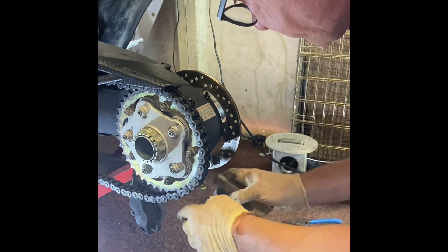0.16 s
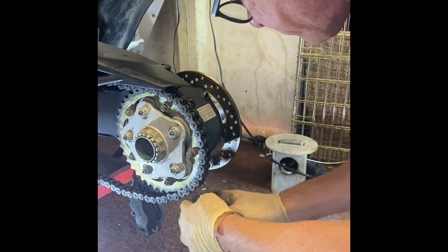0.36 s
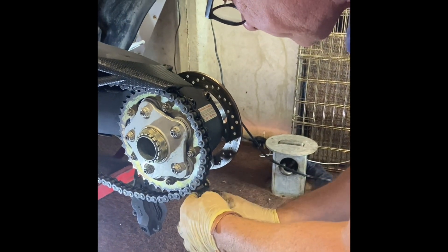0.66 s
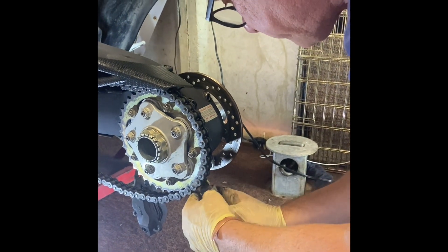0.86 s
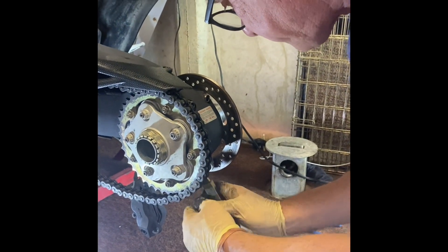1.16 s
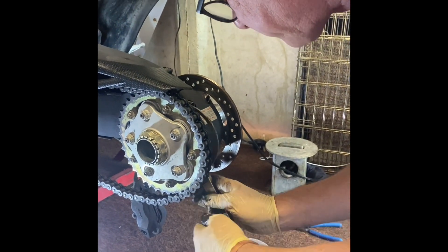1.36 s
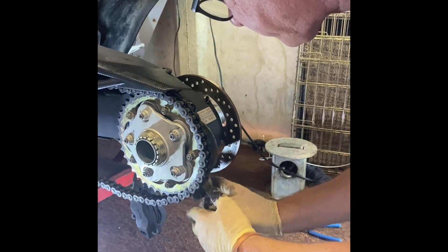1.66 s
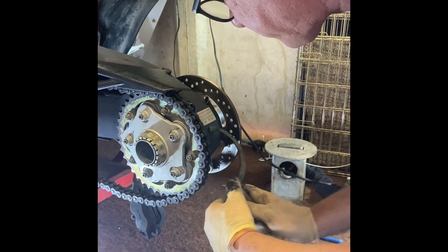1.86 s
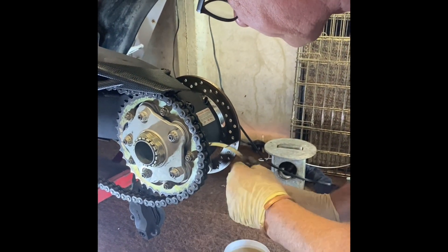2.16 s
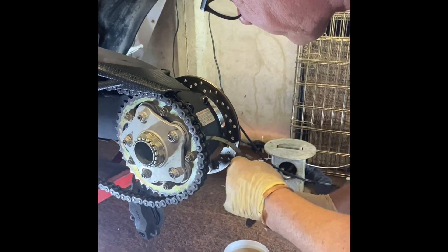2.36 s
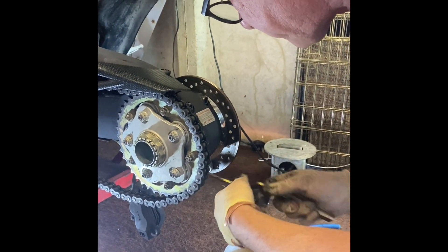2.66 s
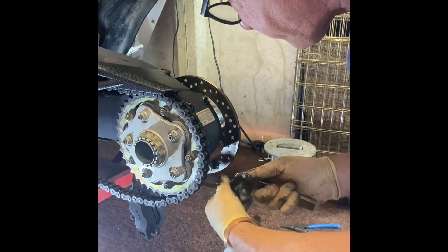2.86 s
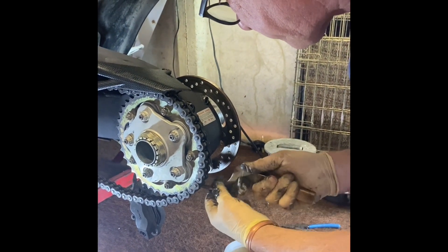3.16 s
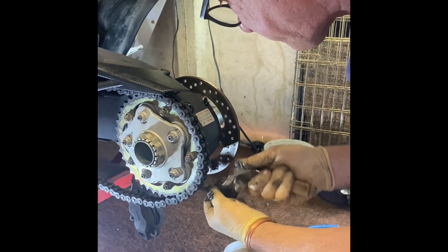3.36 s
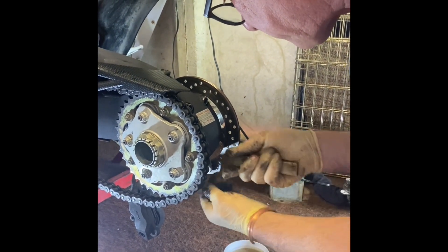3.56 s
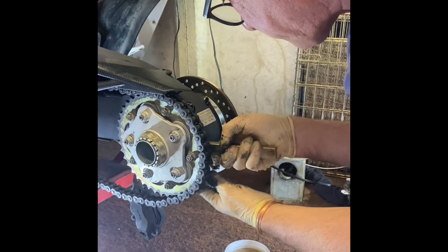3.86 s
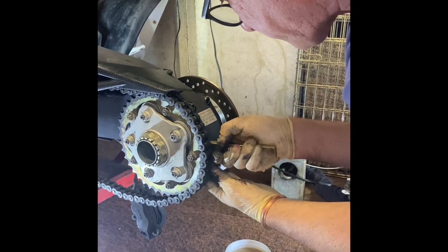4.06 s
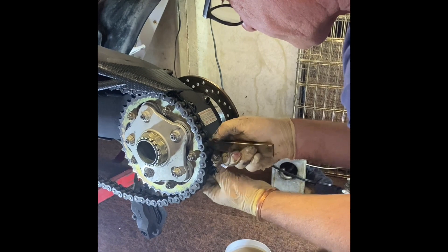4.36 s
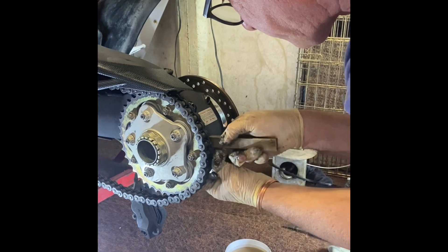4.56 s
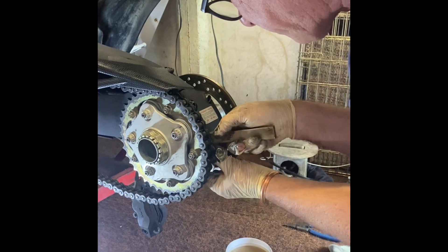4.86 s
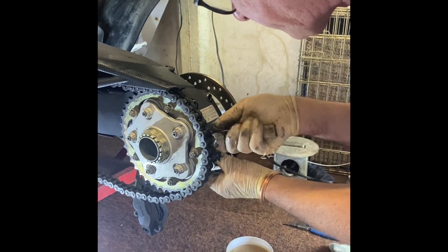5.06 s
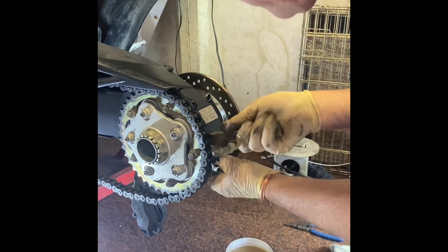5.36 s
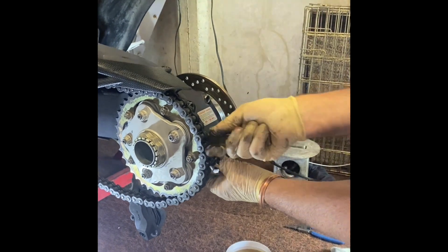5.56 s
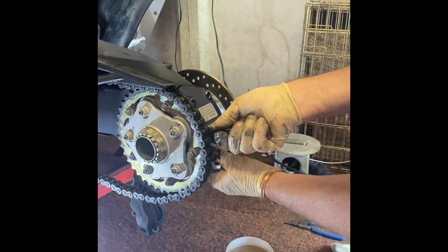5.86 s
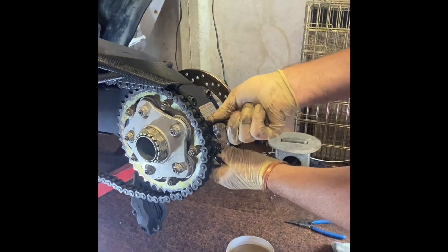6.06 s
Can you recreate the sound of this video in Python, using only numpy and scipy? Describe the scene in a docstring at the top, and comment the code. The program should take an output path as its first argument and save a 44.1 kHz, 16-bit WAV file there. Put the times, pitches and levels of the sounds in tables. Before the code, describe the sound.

Close stereo pickup in a small garage. A soft glove rub, then from under a second a loose steel chain clinks, scrapes and jangles brightly over a sprocket for about two seconds. Gripped firmly, it turns to drier, duller clicks with rubbery rubs; after a sparse stretch, sharp knocks land near the end. Faint birds, low motor hum and a quiet outdoor rush continue underneath.

```python
"""Birds call faintly outside and a motor hums in the building, over a quiet rush, from start to end.
A glove rub opens; from about 0.7 s gloved hands feed a slack steel drive chain over a motorcycle's
rear sprocket: modal links rattle, jostle and scrape, and the sprocket's sine modes ring.
By 2.8 s the grip is full and damps the links to dull clicks; rubber rubs in grains of noise, faint
ticks seat the links, and late blows near 5.3-5.6 s thud through the wheel. Garage walls answer."""
import sys
import numpy as np
from scipy import signal
from scipy.fft import rfft, irfft, next_fast_len
from scipy.io import wavfile
from scipy.ndimage import uniform_filter1d, map_coordinates

SR = 44100
rng = np.random.default_rng(int(sys.argv[2]) if len(sys.argv) > 2 else 0)


def to_wav(sig):
    """Store sig (one row per channel, or 1-D mono) as 16-bit WAV at the path in sys.argv[1].

    Samples outside -1..1 are clipped; the rate is SR.
    """
    pcm = np.clip(np.atleast_2d(sig), -1, 1) * 32767
    pcm = np.round(pcm).astype(np.int16)
    wavfile.write(sys.argv[1], SR, pcm.T)  # frames by channels


N = 272979
TIME = np.arange(N) / SR
# Levels in tables are source levels, ahead of the mix gains.


def amp(db):
    """dB to linear gain."""
    return 10 ** (np.asarray(db) / 20)


def unit(x):
    """Scale to rms 1."""
    return x / np.sqrt(np.mean(x ** 2) + 1e-20)


def burst(x):
    """Scale to the energy of 10 ms at rms 1."""
    return x * np.sqrt(SR / 100 / (np.sum(x ** 2) + 1e-20))


def along(points, hz):
    """Interpolate (f/Hz, value) points on a log frequency axis."""
    f, v = np.transpose(points)
    return np.interp(np.log(hz + 1), np.log(f + 1), v)


def curve(points):
    """Interpolate (t/s, value) points at every sample."""
    return np.interp(TIME, *np.transpose(points))


def wobble(knots_per_s, size=N):
    """Smooth random curve."""
    knots = rng.standard_normal(int(size * knots_per_s / SR) + 4)
    return map_coordinates(knots, [TIME[:size] * knots_per_s])


def filtered(x, response):
    """Multiply the spectrum by a complex response of frequency."""
    n = x.shape[-1]
    m = next_fast_len(n + SR // 20)
    return irfft(rfft(x, m) * response(np.fft.rfftfreq(m, 1 / SR)), m)[..., :n]


def band(x, low_hz, high_hz, order=2):
    """Causal Butterworth band-pass."""
    edges_hz = [low_hz, min(high_hz, SR / 2 - 1)]
    return signal.sosfilt(signal.butter(order, edges_hz, "band", fs=SR, output="sos"), x)


def add(track, s, sound):
    """Mix a sound into a track at time s."""
    part = track[max(0, round(s * SR)):][:len(sound)]
    part += sound[:len(part)]


# Rush spectrum: f/Hz, relative density/dB per Hz
AIR_SPECTRUM = [(25, -14.5), (58, 2), (110, -0.5), (200, -12.5), (850, -25.5), (6000, -28), (8500, -54),
                (16000, -59)]
# Brief dips of the rush: t/s
LULLS_S = [0.39, 4.9, 5.76]
LULL_HALF_S, LULL_DEPTH_DB = .09, 2.5
AIR_SWELL_DB, AIR_PATCH_DB = 0.95, 2.5  # rms of slow swell and of time-frequency patches


def air():
    """Outdoor rush: shaped noise that swells and sinks in patches, nearly mono in the bass."""
    z = signal.stft(rng.standard_normal((2, N)), nperseg=1024)[2]
    patches = uniform_filter1d(rng.standard_normal(z.shape[1:]), 14, 0)
    patches = unit(uniform_filter1d(patches, 12, 1))
    noise = signal.istft(z * amp(AIR_PATCH_DB * patches), nperseg=1024)[1][:, :N]
    mid, side = filtered(noise, lambda hz: amp(along(AIR_SPECTRUM, hz)))
    side = filtered(side, lambda hz: amp(along([(70, -17.5), (300, 3), (2000, 3.5)], hz)))
    level = amp(-64.0 + AIR_SWELL_DB * wobble(6.0))
    rush = level * unit(np.array([mid + side, mid - side]))
    lulls = sum(np.exp(-((TIME - s) / LULL_HALF_S) ** 2) for s in LULLS_S)
    return rush * amp(-LULL_DEPTH_DB * lulls)


# Motor hum: t/s, level/dB rms of the fundamental
HUM_LEVEL = [(.6, -53.5), (.9, -60), (2.5, -61.5), (2.85, -55), (3.9, -53.5), (5.4, -59), (6.1, -54.5)]
HUM_HZ = 80.4


def hum():
    """Distant motor: a drone of wavering pitch and level with a weak third harmonic."""
    level = amp(curve(HUM_LEVEL) + 1.3 * wobble(21))
    phase = 2 * np.pi * np.cumsum(HUM_HZ + 1.9 * wobble(3.0)) / SR
    return np.sqrt(2) * level * (np.sin(phase) + amp(-30.5) * np.sin(3 * phase))


# Single calls: t/s, length/s, start f/Hz, end f/Hz, level/dB
WHISTLES = [(.4, 0.36, 1850, 2230, -81), (2.18, 0.19, 2220, 2050, -79.5), (1.95, 0.25, 2800, 2520, -75.5),
            (6.02, 0.12, 2060, 2030, -78.5)]
# Repeats of a second bird's phrase: t/s, level/dB
CHIRPS = [(0.159, -84), (0.491, -80.5), (4.0, -86.5), (4.73, -80.5), (5.109, -82.5), (5.832, -82.5)]
# Its syllables: delay/s, length/s, start f/Hz, end f/Hz, relative level/dB
PHRASE = [(0, 0.073, 7040, 5570, -4.5), (0.03, .12, 4145, 3700, -3)]
CALL_ARCH = .022  # mid-call pitch lift, share
BIRD_BREATH_DB = 5  # level flutter, rms


def birds(pitch_waver):
    """Bird calls: each swells, flutters and fades while its pitch glides and settles."""
    track = np.zeros(N)
    chirps = [(s + delay, length, start_hz, end_hz, db + rel_db)
              for s, db in CHIRPS for delay, length, start_hz, end_hz, rel_db in PHRASE]
    for s, length, start_hz, end_hz, db in WHISTLES + chirps:
        u = np.linspace(0, 1, int(length * SR))
        arch = np.sin(np.pi * u)
        glide_hz = end_hz + (start_hz - end_hz) * (1 - u) ** 2
        hz = glide_hz * (1 + CALL_ARCH * arch + pitch_waver * wobble(400.3, size=len(u)))
        level = amp(db + BIRD_BREATH_DB * wobble(78.6, size=len(u))) * arch
        add(track, s, level * np.sin(2 * np.pi * np.cumsum(hz) / SR))
    return track


# Garage decay: f/Hz, t60/s
GARAGE = [(150, 0.55), (1000, 0.2), (4000, 0.14), (14000, 0.0038)]


def garage(x, build_s=0.0018):
    """Diffuse wall answer: convolution with decaying noise, different at each microphone."""
    hz, t, z = signal.stft(rng.standard_normal((2, SR // 2)), SR, nperseg=256)
    decay = amp(-60 * t / along(GARAGE, hz)[:, None]) * (1 - np.exp(-t / build_s))
    tail = signal.istft(z * decay, SR, nperseg=256)[1]
    return signal.fftconvolve(x[None], tail / np.linalg.norm(tail[0]), axes=1)[:, :N]


# Gained by the right port and lost by the left: f/Hz, level/dB
SHADE = [(80, 1), (220, 6), (1100, 3), (6000, 0.06)]


def placed(x, lead_samples=2.19, right_db=0):
    """Two ports: the left hears slightly earlier, the right louder, most in the low middle."""
    left = filtered(x, lambda hz: amp(-along(SHADE, hz)))
    delay = lambda hz: np.exp(-2j * np.pi * hz * lead_samples / SR)
    right = filtered(x, lambda hz: amp(along(SHADE, hz)) * delay(hz))
    return np.array([amp(-right_db) * left, amp(right_db) * right])


# Dull blows through wheel and stand: t/s, level/dB, f/Hz
THUDS = [(0.047, -51, 380), (0.795, -54.5, 475), (1.25, -53, 300.5), (2.795, -42, 368.5),
         (3.189, -48, 278.5), (5.301, -50, 337), (5.575, -49, 758), (5.581, -49, 295.7)]
# Low wheel modes, ratio to a thud's pitch
WHEEL_RATIOS = (.7, .95, 1.25)
THUD_T60_S = 0.11


def wheel():
    """Heavier blows shake wheel and stand: low sine modes plus band noise, decaying."""
    track, t = np.zeros(N), np.arange(SR // 3) / SR
    for s, db, hz in THUDS:
        boom = sum(np.sin(2 * np.pi * hz * ratio * t) for ratio in WHEEL_RATIOS)
        rumble = unit(band(rng.standard_normal(len(t)), hz / 1.8, hz * 1.9))
        add(track, s, amp(db - 60 * t / THUD_T60_S) * unit(boom + rumble))
    return track


# Glove strokes: t/s at the middle, length/s, rub level/dB, rustle relative level/dB
STROKES = [(0.086, 0.3, -67.5, 6), (1.209, 0.15, -51, -14), (3.28, 0.47, -73, 2), (3.922, 0.07, -56.5, -14),
           (4.179, 0.058, -58.5, -4), (4.433, 0.22, -56.5, -9), (4.68, 0.15, -59.5, -14),
           (5.033, 0.096, -70, 13), (5.219, 0.27, -82.5, 13), (5.345, 0.14, -60.5, -4),
           (5.568, 0.14, -52, 3.5), (5.928, 0.12, -69, 5)]


def grains():
    """Noise broken into small grains by a fast random level."""
    return rng.standard_normal(N) * amp(4.3 * wobble(450))


def gloves():
    """Rubber rubs and rustles over greasy links: grainy noise that swells and fades per stroke."""
    rub_level = rustle_level = 0
    for s, length, db, rustle_db in STROKES:
        swell = amp(db) * np.exp(1 - np.hypot(1, 5.07 * (TIME - s) / length))
        rub_level = rub_level + swell
        rustle_level = rustle_level + amp(rustle_db) * swell
    pressure = amp(2 * wobble(25))
    rub = rub_level * unit(band(grains(), 340, 3300))
    rustle = rustle_level * unit(band(grains(), 2900, 6000, order=3))
    return (rub + rustle) * pressure


# Clear notes left by some blows: t/s, level/dB, f/Hz, t60/s
NOTES = [(1, -24.5, 4276, 0.054), (1.273, -39.5, 1125, 0.09), (1.343, -33, 1150, 0.047),
         (1.542, -42.5, 1112, 0.095), (1.836, -20.5, 4430, 0.047), (2.324, -25, 5560, 0.044),
         (2.469, -49.5, 1076, 0.2), (2.502, -15.5, 4200, 0.034), (2.791, -35, 1750, 0.035),
         (2.932, -56, 587, 0.18), (3.339, -30.5, 6684, 0.077), (5.278, -15, 4330, 0.0073),
         (5.362, -26.5, 4346, 0.029)]


def notes():
    """A part that hangs free rings on: one decaying sine of shaken phase."""
    track, t = np.zeros(N), np.arange(SR // 3) / SR
    for s, db, hz, t60 in NOTES:
        phase = 2 * np.pi * hz * t + .4 * wobble(120, size=len(t))
        add(track, s, amp(db - 60 * t / t60) * (1 - np.exp(-t / 0.0013)) * np.sin(phase))
    return track


def resonate(x, modes, damping, scrape_db=-17):
    """Steel resonances, redrawn per call in pitch and level, over a broad scrape."""
    drawn = []
    for hz, width_hz, db in modes:
        width = width_hz * damping
        centre = hz + 30 * np.sqrt(width / 20) * rng.normal()
        drawn.append((centre, width, amp(db + 3.5 * rng.normal())))

    def response(f):
        """Sum of resonant peaks of alternating sign, plus the flat scrape."""
        peaks = sum((-1) ** k * g * 1j * f * w / (c * c - f * f + 1j * f * w)
                    for k, (c, w, g) in enumerate(drawn))
        return peaks + amp(scrape_db)

    return filtered(x, response)


# Main link resonances, slack: f/Hz, width/Hz, level/dB
LINK = [(3400, 300, -11), (3900, 200, -7), (4280, 75, 3), (4490, 110, -3), (4850, 200, -14)]
LINK_SPREAD = .025  # pitch deviation between links, share


def link_modes():
    """Main resonances of one link, at its own pitch."""
    pitch = 1 + LINK_SPREAD * rng.normal()
    return [(hz * pitch, width, db) for hz, width, db in LINK]


def bright_modes(db=0):
    """Two upper resonances of one link, drawn over a range; slack width 80 Hz."""
    return [(hz, 80, db) for hz in rng.uniform(5400, 6800, size=2)]


# Briskness of the slack chain's slide: t/s, level/dB
FEED = [(0.869, -73.5), (1.02, -57.5), (1.12, -77), (1.29, -52.5), (1.63, -69.5), (1.72, -51.5),
        (1.902, -48), (2.04, -64.5), (2.26, -70), (2.349, -56), (2.509, -55.5), (2.778, -71.5)]
LINKS_PER_S = 28
SLIDE_DB = -3.5  # scrape relative to FEED


def slide():
    """Moving chain scrapes the teeth: overlapping noise chatters through each link's resonances."""
    track, size = np.zeros(N), int(2 * SR / LINKS_PER_S)
    for s in np.arange(FEED[0][0], FEED[-1][0], 1 / LINKS_PER_S):
        chatter = rng.standard_normal(size) * amp(11 * wobble(450, size=size)) * np.hanning(size)
        scrape = resonate(chatter, link_modes() + bright_modes(db=-6), 1)
        scrape = unit(band(scrape, 1800, 6800))
        add(track, s - 1 / LINKS_PER_S, amp(4 * rng.normal()) * scrape)
    return amp(SLIDE_DB + curve(FEED)) * unit(track)


JOSTLE_PER_S, JOSTLE_DB = 11, 7  # level relative to FEED
JOSTLE_KNOCK_DB, JOSTLE_BRIGHT_DB, JOSTLE_S = -9.5, -0.5, 0.014  # last: rattle length


def jostles():
    """Random small contacts while the chain slides, stronger when it slides briskly."""
    times, feed_db = np.transpose(FEED)
    count = int(JOSTLE_PER_S * (times[-1] - times[0]))
    moments = rng.uniform(times[0], times[-1], count)
    return [(s, np.interp(s, times, feed_db) + JOSTLE_DB, JOSTLE_KNOCK_DB, JOSTLE_BRIGHT_DB, JOSTLE_S)
            for s in moments]


# Fingers seat the links: t/s, level/dB
TICKS = [(4.089, -58.5), (4.426, -55.5), (4.668, -56), (5.206, -61)]


def ticks():
    """Held links shift between the fingers: contacts with faint dry ticks."""
    return [(s, db, JOSTLE_KNOCK_DB, -10, .004) for s, db in TICKS]


# Hands close on the chain: t/s, grip/0-1
GRIP = [(1.45, 0), (1.7, .1), (2.55, .1), (2.8, 1)]
GRIP_WIDENS = 3.67  # extra damping at full grip, ratio
GRIP_MUTES_DB, GRIP_PAN_DB = 4, 0.5  # at full grip: teeth muted; right up and left down


def grip(s):
    """How firmly the chain is held at time s, 0-1."""
    return np.interp(s, *np.transpose(GRIP))


# Sprocket modes, slack chain: f/Hz, level/dB, t60/s
SPROCKET = [(1120, -6, .13), (2396, 2, .16), (4270, 9, .12), (5610, 6, .14), (6218, 13, .15),
            (7537, 8, .15), (7876, 8, .16), (11350, -2, .17), (12540, -2, .16), (14600, 0, .2)]
# Striking link's high partials: low f/Hz, high f/Hz, level/dB
PARTIALS = [(5000, 7000, 11), (7300, 8200, 9), (9500, 13000, -2), (14700, 15700, 2)]
PARTIAL_T60_S = 0.041  # slack
LOAD_DETUNE, LOAD_WAVER_RAD = .007, .8  # mode shift (share, slack), phase shake


def sprocket(t, damping):
    """A blow wakes sprocket modes detuned by the links on it; the striking link adds high partials."""
    partials = [(rng.uniform(low, high), db, PARTIAL_T60_S) for low, high, db in PARTIALS]
    ring = 0
    for hz, db, t60 in SPROCKET + partials:
        loaded_hz = hz * (1 + LOAD_DETUNE * damping * rng.normal())
        phase = 2 * np.pi * (loaded_hz * t + rng.random())
        phase = phase + LOAD_WAVER_RAD * wobble(150, size=len(t))
        level = amp(db + 4.5 * rng.normal() - 60 * t * damping / t60)
        ring = ring + level * np.sin(phase)
    return ring * (1 - np.exp(-t / 0.00031))


def rattle(t, length, lead_db, impacts_per_s=2200, first=1.44, grit=0.058):
    """Links slide, catch with a first blow at t = 0, then pins, rollers and plates chatter away."""
    impacts = (rng.random(len(t)) < impacts_per_s / SR) * rng.standard_normal(len(t))
    impacts = impacts + grit * rng.standard_normal(len(t))
    impacts[np.searchsorted(t, 0)] = first
    lead_in = amp(lead_db) * np.exp(-np.abs(t) / .004)
    return impacts * np.where(t < 0, lead_in, np.exp(-(t / max(length, 1e-4)) ** 2))


# Clearest chain contacts: t/s, link level/dB, knock relative level/dB, bright relative level/dB,
# rattle length/s
CONTACTS = [(0.706, -43, -10, -4, 0.0021), (0.724, -48.5, 3, 2, 0.04), (0.787, -55, 9, 3, 0.0044),
            (0.898, -54.5, 3.5, -24, 0.015), (1.001, -44.5, -16, 3, 0.014),
            (1.046, -39.5, 4.5, -6.5, 0.0053), (1.162, -53, -2.5, 0, 0.0014), (1.216, -38.5, 3, 4.5, 0.016),
            (1.238, -41, 0.5, 9, 0.021), (1.265, -37.5, -6.5, 8, 0.0154), (1.283, -41, -8, 8.5, 0.015),
            (1.342, -39.5, -5, 15, 0.0051), (1.355, -38, -11, 8, 0.0067), (1.415, -47.5, 4.5, 11.5, 0.031),
            (1.543, -53, -9, 18, 0.0054), (1.667, -53.5, -9, 16, 0.002), (1.695, -42, -14.5, 2.5, 0.0067),
            (1.733, -35.5, -32, 9.5, 0.011), (1.762, -48, -28, 12, 0.0037),
            (1.799, -42.5, -15, 17.5, 0.004), (1.837, -41.5, -5, 9.5, 0.008), (1.881, -44, -8, 9, 0.02),
            (1.906, -43.5, -3.5, 0, 0.0073), (1.925, -36.5, -14, 1, 0.0044), (2.068, -51, -27, 15, 0.0011),
            (2.08, -41.5, -16, 1, 0.0049), (2.177, -39.5, -11.5, 8.5, 0.018), (2.201, -41.5, -4, 1, 0.003),
            (2.317, -38, -6, -3.5, 0.017), (2.331, -43, -3, 11.5, 0.028), (2.361, -39.5, -22, -5, 0.0157),
            (2.472, -43, -9, 7.5, 0.017), (2.497, -35.5, -12.5, 0.5, 0.0064),
            (2.504, -32.5, -15.5, 4, 0.0015), (2.575, -47, -8, -21, 0.0071),
            (2.604, -47, -22.5, 4.5, 0.0053), (2.788, -40.5, -4, 6, 0.014), (2.922, -47, -28, 8, 0.0094),
            (2.933, -41, -17, -16, 0.016), (3.126, -44.5, -5.5, 12, 0.014), (3.171, -47, -10, -7, 0.0031),
            (3.186, -48, -1, 12, 0.01), (3.331, -52, -5, -2, 0.0047), (3.34, -36, -16, 10, 0.0022),
            (3.43, -45, -8.5, 5.5, 0.0067), (3.601, -40, -11, 5, 0.0115), (3.652, -43.5, -5, 9, 0.00061),
            (3.664, -38.5, -13.5, 7, 0.0019), (3.705, -35.5, -8, 7.5, 0.012), (3.818, -40, -9, 7, 0.0034),
            (4.027, -54.5, -34, -6.5, 0.000083), (4.111, -51.5, -9, -36, 0.00069),
            (4.323, -52, -2.5, -12, 0.0044), (4.367, -42, -4.5, -37, 0.0074), (4.492, -47, -7, -22, 0.0018),
            (4.602, -49, -13.5, -25.5, 0.00084), (5.281, -31, -12, -9, 0.0002),
            (5.325, -49, -6, -14.5, 0.0039), (5.531, -44, -3, 4, 0.012), (5.556, -41, -4, -4.5, 0.054),
            (5.576, -31, -1, -11, 0.0084)]
# Low resonances of the slack chain: f/Hz, width/Hz, level/dB
KNOCK = [(1080, 250, -11.5), (1142, 58, 7.5), (1666, 180, 4.5), (2306, 200, 8.5), (3140, 1040, -2.5)]
LEAD_S = .012  # slide ahead of the catch
TEETH_DB = -15.5  # teeth relative to bright
BODY_DB, BODY_T60_S = -22, 0.24  # wheel shudder relative to knock


def chain(contacts):
    """Rattles excite link resonances, nudge the wheel and, when bright, ring the sprocket."""
    track, t = np.zeros(N), np.arange(SR // 6) / SR
    brief = t[:SR // 12]
    for s, db, knock_db, bright_db, length in contacts:
        held = grip(s)
        damping = 1 + GRIP_WIDENS * held
        force = rattle(brief - LEAD_S, length, lead_db=-18.5 + 5.4 * held)
        link = resonate(force, link_modes(), damping, scrape_db=-14 + 5 * held)
        link = burst(band(link, 2900, 5300, order=2))
        knock = resonate(force, KNOCK, damping, scrape_db=-12.5)
        knock = burst(band(knock, 650, 3200, order=3))
        bright = resonate(force, bright_modes(), damping, scrape_db=-27)
        bright = burst(band(bright, 4800, 7300, order=4))
        teeth_db = bright_db + TEETH_DB - GRIP_MUTES_DB * held
        crack = burst(band(force * np.exp(-brief / 0.018), 4700, 7900, order=3))
        shudder = rng.standard_normal(len(brief)) * amp(-60 * brief / BODY_T60_S)
        body = burst(band(shudder, 240, 1200))
        contact = amp(5.0) * link + amp(knock_db) * knock
        contact = contact + amp(bright_db - 11.0) * bright + amp(teeth_db - 2.0) * crack
        add(track, s - LEAD_S, amp(db) * contact)
        add(track, s, amp(db + knock_db + BODY_DB) * body)
        add(track, s, amp(db + teeth_db - 7.5) * sprocket(t, damping))
    return track


def scene():
    """Metal and gloves are close; the birds arrive both directly and by way of the walls."""
    calls = birds(pitch_waver=.028)
    far = amp(15.5) * calls + amp(15.0) * garage(calls)
    thuds = wheel()
    low = placed(amp(-2) * thuds + hum()) + amp(-8.5) * garage(thuds)
    metal = chain(CONTACTS) + chain(jostles() + ticks()) + slide() + notes()
    near = placed(metal + gloves(), right_db=GRIP_PAN_DB * grip(TIME)) + amp(-9.5) * garage(metal)
    return near + low + far + air()


def record(dry):
    """Nothing is kept above the 16.3 kHz band limit."""
    return filtered(dry, lambda hz: hz < 16300)


dry = scene()
out = record(dry)
to_wav(out)
```